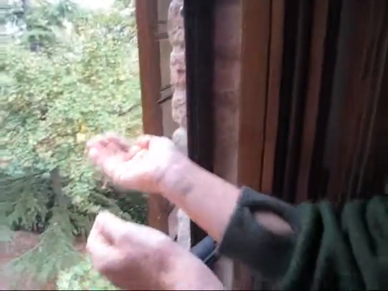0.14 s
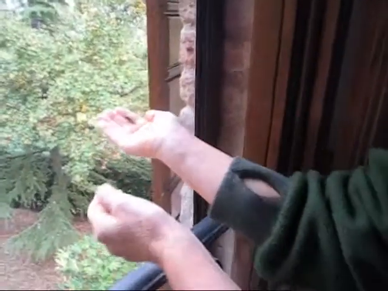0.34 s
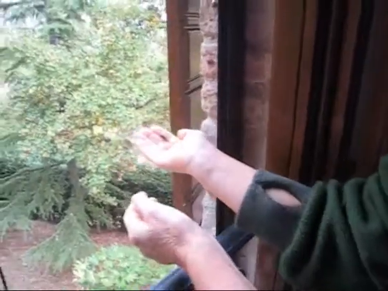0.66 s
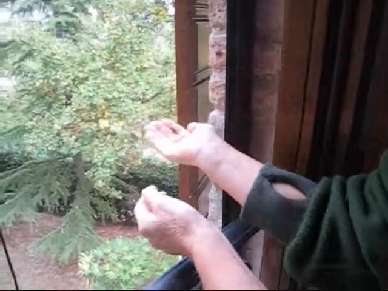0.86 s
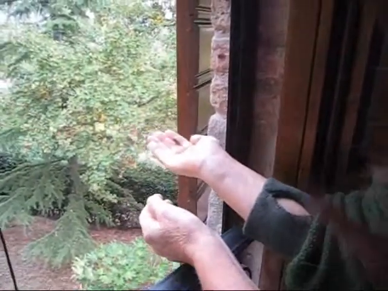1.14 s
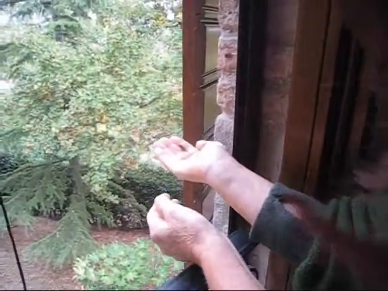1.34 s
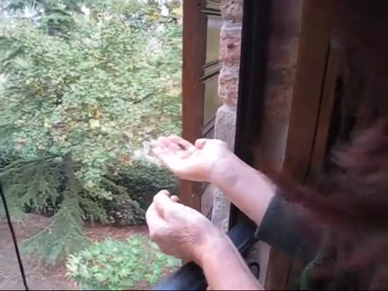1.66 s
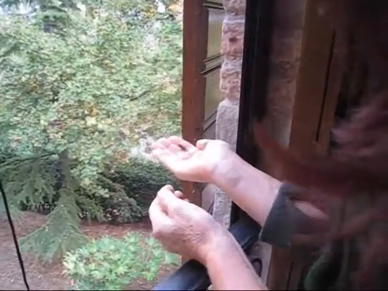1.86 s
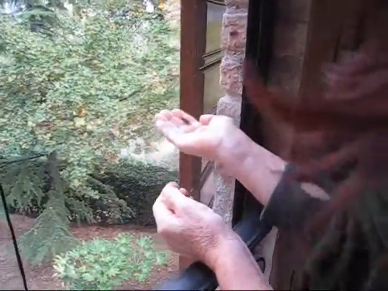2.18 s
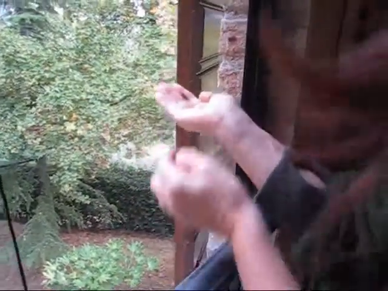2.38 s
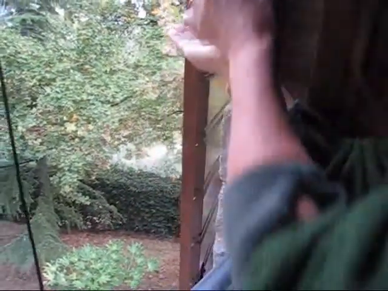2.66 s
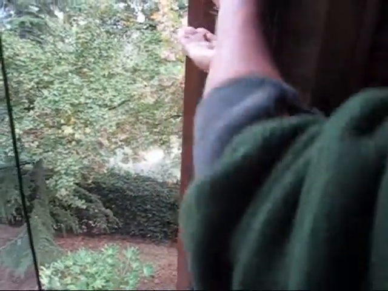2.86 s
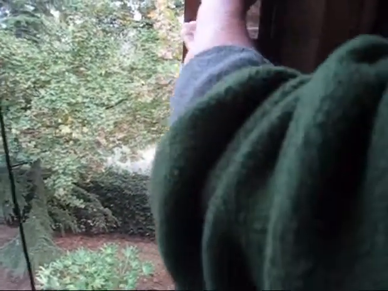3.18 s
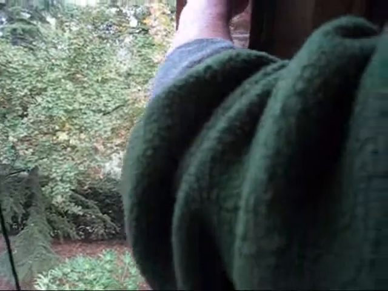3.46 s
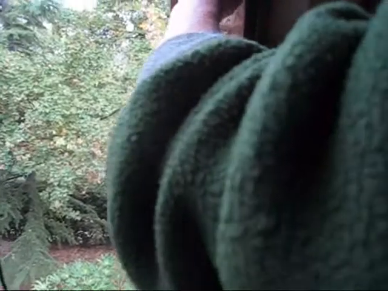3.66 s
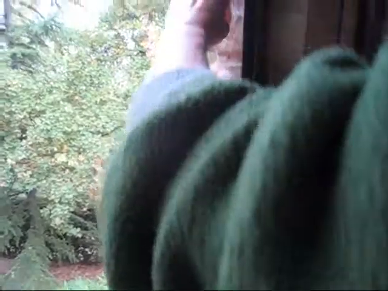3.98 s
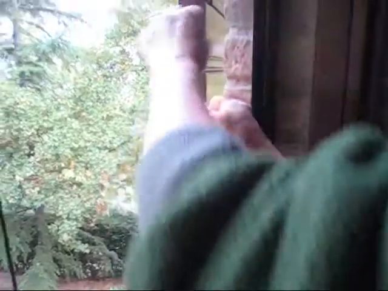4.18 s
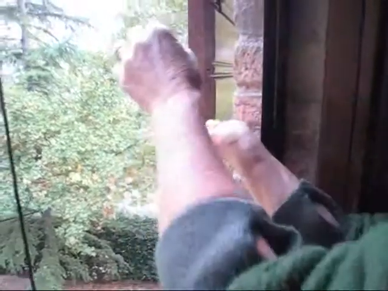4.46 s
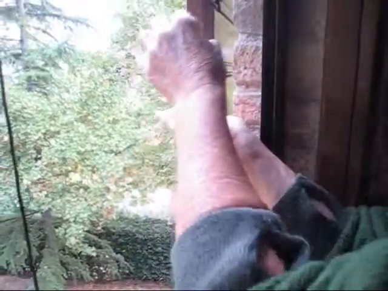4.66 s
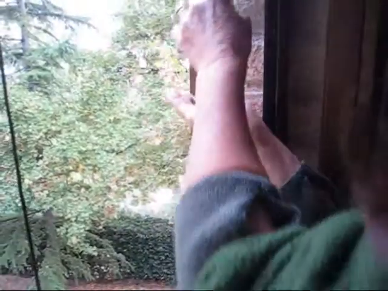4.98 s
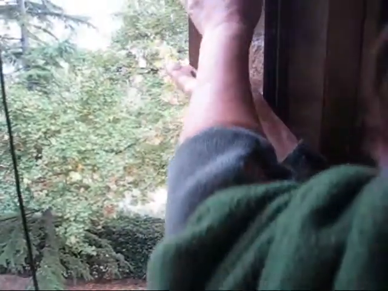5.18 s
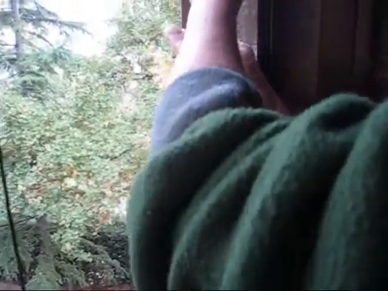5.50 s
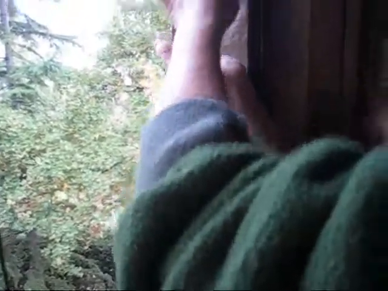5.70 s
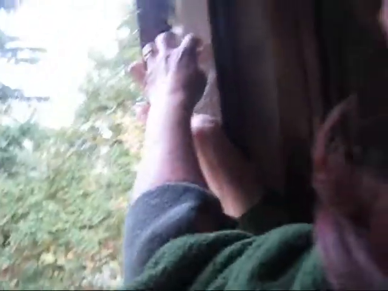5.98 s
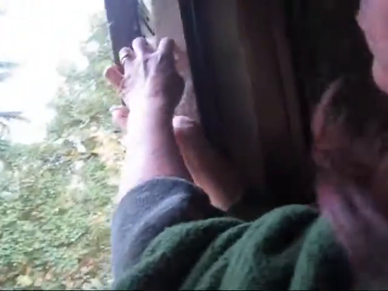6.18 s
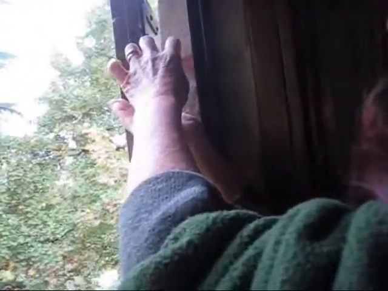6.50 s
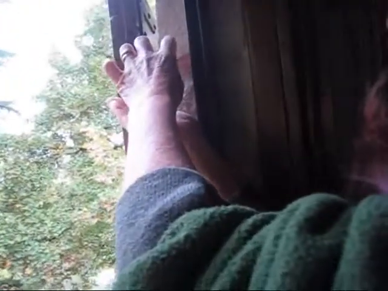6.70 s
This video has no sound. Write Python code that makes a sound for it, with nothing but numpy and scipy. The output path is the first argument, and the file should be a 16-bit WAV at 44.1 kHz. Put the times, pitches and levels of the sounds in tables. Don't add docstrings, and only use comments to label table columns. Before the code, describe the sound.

Outdoors by an open window, two large birds call loudly: two shrill yelps that leap upward, then two deeper hoarse honks. After a pause of over two seconds a second run follows, mostly deep. Fainter birds answer far away. Walls and trees return short echoes. Steady distant traffic, engine drone and soft leaves lie beneath. A small cheap camera gives grainy, dull, boxy sound, with one handling knock near the start.

```python
import sys
import numpy as np
from scipy import signal
from scipy.fft import rfft, irfft, next_fast_len
from scipy.io import wavfile
from scipy.ndimage import uniform_filter1d, map_coordinates

SR = 44100
rng = np.random.default_rng(int(sys.argv[2]) if len(sys.argv) > 2 else 0)


def gain_from_db(level_db):
    decades = np.asarray(level_db, float) / 20
    return 10 ** decades


def unload_wav(signal):
    wavfile.write(
        sys.argv[1],
        SR,
        np.round(np.clip(np.atleast_2d(signal).T, -1, 1) * 32767).astype(np.int16),
    )


N = 301644

# t/s, level/dB
TRAFFIC_SWELL = [(0.0, -40), (0.84, -40), (1.9, -41), (3.11, -40), (3.29, -40.5), (4.08, -40.5),
                 (6.48, -40.5), (6.84, -43)]
# f/Hz, density/dB per Hz
RUMBLE_SPECTRUM = [(36, -34.5), (62, -4.5), (80, -7), (109, 0), (162, 0), (214, -2.5), (285, -13),
                   (330, -16), (430, -44), (730, -120)]
# f/Hz, density/dB per Hz
ROAD_SPECTRUM = [(190, -40), (330, -8), (372, -15.5), (405, -2), (441, -8), (599, -3), (652, -7), (715, -9),
                 (1030, -13.5), (1120, -8), (1480, -19.5), (1800, -19.5), (2340, -47.5), (3960, -120)]
# f/Hz, density/dB per Hz
LEAF_SPECTRUM = [(800, -29.5), (1600, -1), (2500, 3), (4000, -5), (5500, -14.5)]
# t/s, level/dB
BREEZE_SWELL = [(0, -55), (.7, -52.5), (1.2, -56.5), (4.5, -59), (5.7, -56), (6.6, -53), (6.84, -57)]
# f/Hz, wander/Hz, level/dB, flutter/dB
HUM_TONES = [(46.51, 8.3, -42.5, 2.5), (120.6, 12, -48, 2.5), (414.8, 8.8, -56, 2.5)]
# t/s, level/dB, f/Hz, t60/s, push or pull/1
BODY_BUMPS = [
    (0.0223, -19.5, 860, 0.0053, 0.86),
    (0.8625, -12.5, 172, 0.013, 1),
    (.8643, -16, 680, .005, 0.91),
    (0.8661, -23, 39.6, 0.089, -1.2),
    (1.198, -30, 290, 0.013, 0.95),
    (5.93, -35, 1500, 0.0048, 1),
]
# delay/s, level/dB
WALL_ECHOES = [(.012, -13), (.031, -12), (.058, -14.5), (.1, -16.5), (.17, -20.5), (.24, -19.5)]
# f/Hz, t60/s
GARDEN_DECAY = [(400, 1.4), (650, 0.99), (1000, 0.83), (1300, 1.3), (1700, 0.68)]
# f/Hz, width/Hz, level/dB
HOUSING_MODES = [(524.8, 90, -3), (629, 110, 1.5), (1003, 90, -3.5), (1099, 90, -6.5), (1260.5, 90, -3.5),
                 (1436, 100, -4), (1591, 100, -6.5)]
# t/s, gap/s, low level/dB, high level/dB
FAR_ANSWERS = [
    (.222, .038, -30.5, -27),
    (.955, 0.028, -37, -34),
    (1.935, 0.044, -38.5, -29.5),
    (3.975, .02, -34, -35),
    (5.705, 0.035, -33, -34),
]
# t of climb/s, summit f/Hz, climb level/dB, pickup level/dB, low note level/dB
SHRILL_CALLS = [
    (.322, 1567, -18.5, -27, -20.5),
    (.72, 1431, -20, -24.5, -26),
    (5.132, 1392, -21.5, -22, -26.5),
]
# delay/s, length/s, from and to/share of way to summit, level/dB
CLIMB_STEPS = [
    (0, .04, 0.01, .39, 0.5),
    (.025, .088, .32, 1.01, -10),
    (.1, .032, .9, .68, -12),
]
# t of top note/s, lead-in/s, slide-in/s, brightness/dB, scoop level/dB
DEEP_CALLS = [
    (1.416, .07, .006, -1.5, -20),
    (2.09, 0.069, 0.0092, -1, -20),
    (4.791, .08, .017, -2.5, -29),
    (6.005, .088, .004, 3.5, -22),
    (6.638, .07, 0.012, 1, -21.5),
]


def unit(x):
    return x / np.sqrt(np.mean(x ** 2) + 1e-20)


def along(points, hz):
    f, v = np.transpose(points)
    return np.interp(np.log(hz + 1), np.log(f + 1), v)


def swelling(points):
    return np.interp(np.arange(N) / SR, *np.transpose(points))


def wobble(rate, size=N):
    knots = rng.standard_normal(int(size * rate / SR) + 4)
    return map_coordinates(knots, [np.arange(size) * rate / SR])


def filtered(x, response):
    m = next_fast_len(N + SR // 2)
    return irfft(rfft(x, m) * response(np.fft.rfftfreq(m, 1 / SR)), m)[:N]


def add(track, s, sound):
    part = track[round(s * SR):][:len(sound)]
    part += sound[:len(part)]


def rush(spectrum, patchy_db):
    z = signal.stft(rng.standard_normal(N), nperseg=1024)[2]
    field = uniform_filter1d(rng.standard_normal(z.shape), 6, 0)
    field = unit(uniform_filter1d(field, 6, 1))
    noise = signal.istft(z * gain_from_db(patchy_db * field), nperseg=1024)[1][:N]
    return unit(filtered(noise, lambda hz: gain_from_db(along(spectrum, hz))))


def traffic():
    swell_db = swelling(TRAFFIC_SWELL)
    swell_db = swell_db - swell_db.mean()
    rumble = gain_from_db(-39 + swell_db + .7 * wobble(6)) * rush(RUMBLE_SPECTRUM, patchy_db=0.57)
    hiss = gain_from_db(-44 + 1.2 * swell_db + .6 * wobble(4.6)) * rush(ROAD_SPECTRUM, patchy_db=1.18)
    return rumble + hiss


def hums():
    out = np.zeros(N)
    for hz, wander_hz, db, flutter_db in HUM_TONES:
        turn = 2 * np.pi * np.cumsum(hz + .3 * wander_hz * wobble(5)) / SR
        out += gain_from_db(db + 0.5 + flutter_db * wobble(7)) * np.sin(turn)
    return out


def leaves():
    return gain_from_db(swelling(BREEZE_SWELL) + .8 * wobble(8)) * rush(LEAF_SPECTRUM, patchy_db=1.77)


def bumps():
    out, t = np.zeros(N), np.arange(SR // 10) / SR
    for s, db, hz, t60, sign in BODY_BUMPS:
        add(out, s, sign * gain_from_db(db - 60 * t / t60) * np.sin(2 * np.pi * hz * t))
    return out


def housing(f):
    modes = 0
    for k, (centre, width, db) in enumerate(HOUSING_MODES):
        damping = 1j * f * width
        modes = modes + (-1) ** k * gain_from_db(db) * damping / (centre * centre - f * f + damping)
    edge = 1j * f / 1680
    return modes / (1 + edge + edge ** 2) ** 3


def garden(x, wet_db, echo_db):
    size = 2 * SR // 3
    hz, t, z = signal.stft(rng.standard_normal(size), SR, nperseg=512)
    decay = gain_from_db(-60 * t / along(GARDEN_DECAY, hz)[:, None])
    tail = signal.istft(z * decay, SR, nperseg=512)[1][:size]
    build_up = np.clip(np.arange(size) / SR / .08, 0, 1) ** 1.5
    tail = tail * gain_from_db(.9 * wobble(25, size=size)) * build_up
    answer = gain_from_db(wet_db) * tail / np.linalg.norm(tail)
    answer[0] = 1
    for delay, db in WALL_ECHOES:
        answer[round(delay * SR)] += gain_from_db(db + echo_db)
    return signal.fftconvolve(x, answer)


def stage(row, rise, fall, point, bend, third_db, half_db, breath_db, jitter, sag_hz=0):
    _, length, from_hz, to_hz, db, octave_db = row
    u = np.linspace(0, 1, round(length * SR))
    hz = from_hz + (to_hz - from_hz) * (1 - (1 - u) ** bend) - sag_hz * u ** 4
    turn = 2 * np.pi * np.cumsum(hz * (1 + jitter * wobble(120, size=len(u)))) / SR
    overtones = np.sin(2 * turn) + gain_from_db(third_db) * np.sin(3 * turn)
    alternate = gain_from_db(half_db) * np.sin(1.5 * turn)
    breath = gain_from_db(breath_db) * (1 + np.cos(turn)) * rng.standard_normal(len(u))
    tone = np.sin(turn) + gain_from_db(octave_db) * overtones + alternate + breath
    ramp = np.clip(np.minimum(u / rise, (1 - u) / fall), 0, 1)
    swell = np.sin(np.pi / 2 * ramp) ** point
    flutter_db = 60 * jitter * wobble(70, size=len(u))
    return gain_from_db(db + flutter_db) * swell * tone


def sing(rows, wet_db, echo_db, **voice):
    out = np.zeros(N)
    for row in rows:
        add(out, row[0] - .004, garden(stage(row, **voice), wet_db, echo_db))
    return out


def far_calls():
    rows = []
    for s, gap, low_db, high_db in FAR_ANSWERS:
        high = s + gap
        rows += [(s, 0.02, 660, 625, low_db, -15)]
        rows += [(high, 0.0061, 1120, 1085, high_db, -30)]
        rows += [(high + .043, 0.27, 1149.5, 1120.5, high_db - 2.5, -30)]
    return rows


def shrill_calls():
    pickup, low, fall, climb = [], [], [], []
    foot_hz, pickup_end_hz, thin_db = 992.5, 634, -26.5
    for s, summit, climb_db, pickup_db, low_db in SHRILL_CALLS:
        way = summit - foot_hz
        start = s - .027 - .00004 * way
        after = .138 - .00019 * way
        pickup += [(start, .046, 565, pickup_end_hz, pickup_db, -19.5)]
        low += [(s + after, .099 - after, 625, 657, low_db, -31.5 - low_db)]
        fall += [(s + .11, .045, .72 * summit, .69 * summit, -31, thin_db)]
        climb += [(s - .027, .039, pickup_end_hz, foot_hz, pickup_db - 11, thin_db)]
        for t, length, a, b, db in CLIMB_STEPS:
            climb += [(s + t, length, foot_hz + a * way, foot_hz + b * way, climb_db + db, thin_db)]
    return pickup, low, fall, climb


def deep_calls():
    scoop, hoarse, slides, top, drop = [], [], [], [], []
    scoop_hz, top_hz, top_octave_db = 625.5, 612, -15.5
    for s, lead, slide, bright_db, scoop_db in DEEP_CALLS:
        scoop += [(s - lead, .82 * lead, scoop_hz - 2700 * lead, scoop_hz, scoop_db, -15.5)]
        more = .6 * slide
        from_hz, to_hz = 490 - 1800 * slide, 542.7 - 6.5 * bright_db
        hoarse += [(s - .029 - more, .034 + more, from_hz, to_hz, -24, bright_db)]
        slides += [(s, 1.7 * slide, top_hz - 3000 * slide, top_hz, -19, top_octave_db)]
        top += [(s + slide, .069 - slide, top_hz, 646.9, -14, top_octave_db + bright_db)]
        drop += [(s + .061, .032, 575, 505, -28, -9)]
    return scoop, hoarse, slides, top, drop


def birds():
    scoop, hoarse, slides, top, drop = deep_calls()
    pickup, low, fall, climb = shrill_calls()
    out = sing(far_calls(), wet_db=-14, echo_db=-8, rise=0.3, fall=0.55, point=1.3, bend=1.1,
               third_db=-5, half_db=-24.0, breath_db=-2.5, jitter=.02)
    out += sing(climb, wet_db=-15, echo_db=-4, rise=0.4, fall=.5, point=1.5, bend=1.3,
                third_db=-12, half_db=-25, breath_db=-7.5, jitter=.012)
    out += sing(scoop + pickup, wet_db=-13.5, echo_db=-3.5, rise=.62, fall=.5, point=2.3, bend=2.3,
                third_db=-7, half_db=-15.5, breath_db=-5, jitter=.018)
    out += sing(hoarse, wet_db=-10.0, echo_db=-3.5, rise=0.43, fall=.35, point=1.3, bend=1.1,
                third_db=-6.5, half_db=-10.0, breath_db=1.5, jitter=.022)
    out += sing(low + slides, wet_db=-15, echo_db=-8, rise=.4, fall=.5, point=1.2, bend=1.6,
                third_db=-1.0, half_db=-22.5, breath_db=-12, jitter=.005)
    out += sing(top, wet_db=-17.5, echo_db=-9.0, rise=.13, fall=.6, point=1.1, bend=3.2,
                third_db=-2.0, half_db=-21, breath_db=-12.5, jitter=.003, sag_hz=34.8)
    out += sing(drop + fall, wet_db=-12.5, echo_db=-1.5, rise=.4, fall=.55, point=1.3, bend=1.1,
                third_db=2.5, half_db=-12.5, breath_db=0, jitter=.012)
    return out


def scene():
    background = traffic() + hums() + leaves()
    return (background + bumps() + filtered(birds(), housing))[None]


def roll_off(x):
    return signal.sosfilt(signal.butter(12, 15540, fs=SR, output="sos"), x)


def record(dry):
    rate, steps = 11024, 128
    analog = dry[0] + gain_from_db(-52.5) * rng.standard_normal(N)
    analog = filtered(analog, lambda hz: hz < rate / 2) - .0025
    tick = np.floor(np.arange(N) * rate / SR)
    held = np.interp(tick * SR / rate, np.arange(N), analog)
    mix = np.round(held * steps) / steps
    return roll_off(mix)


dry = scene()
out = record(dry)
unload_wav(out)
```